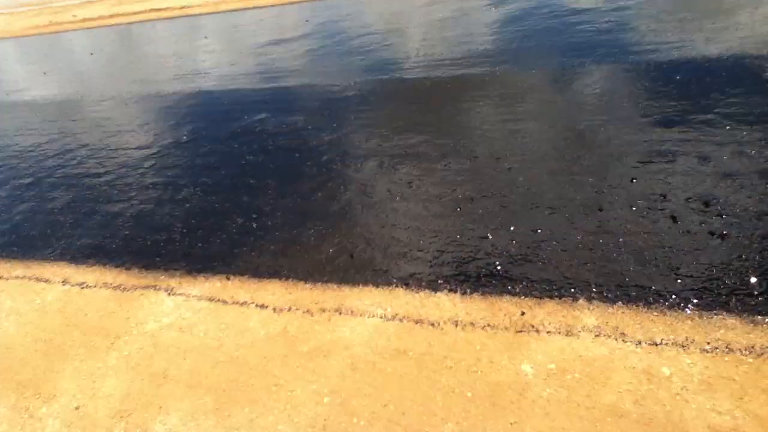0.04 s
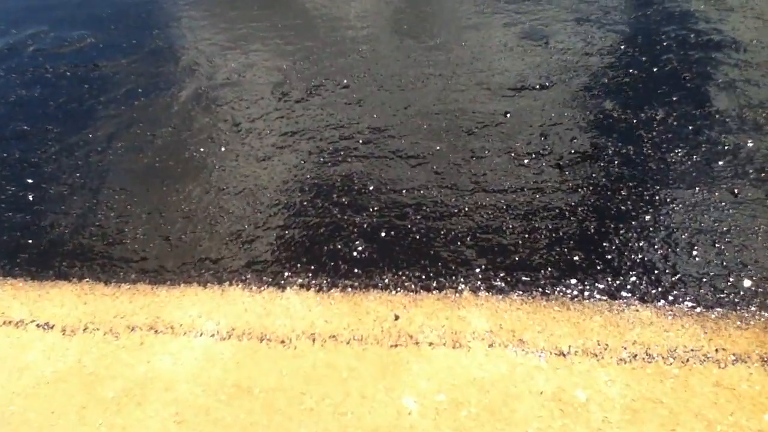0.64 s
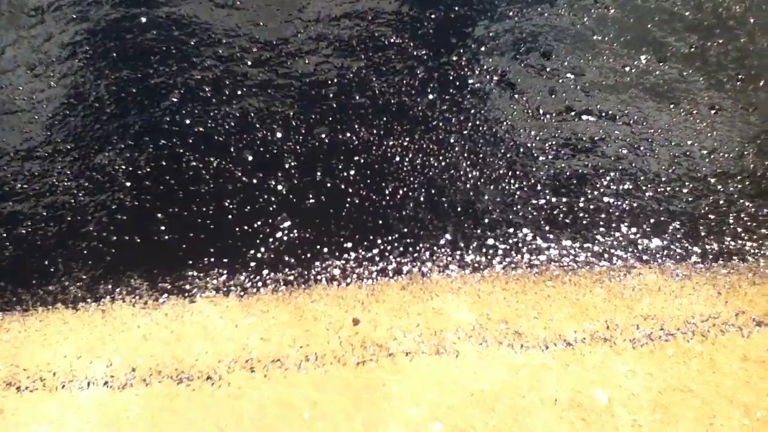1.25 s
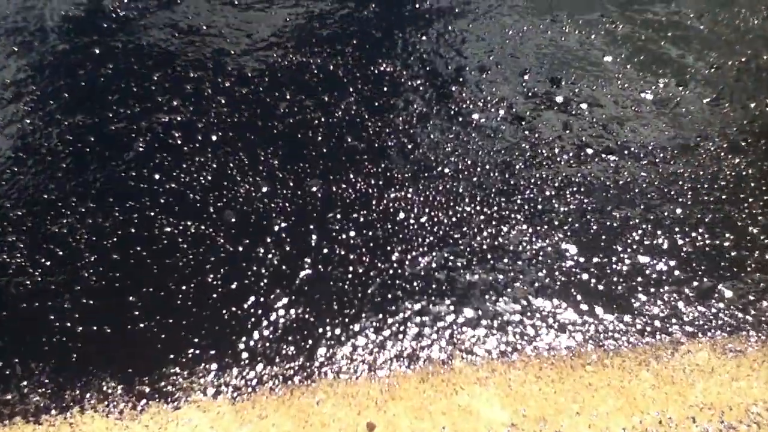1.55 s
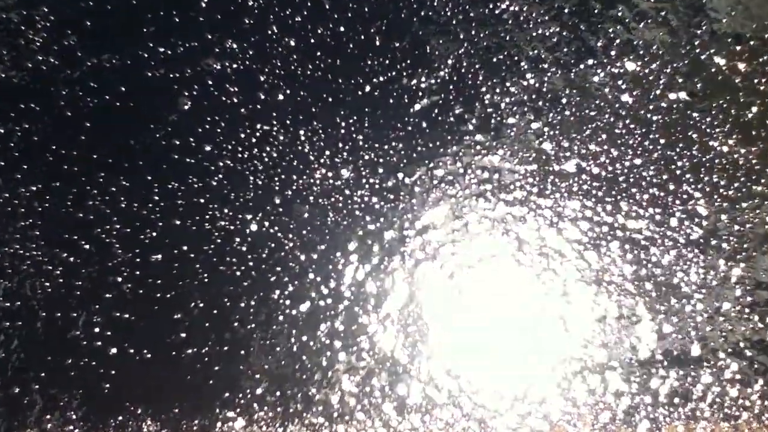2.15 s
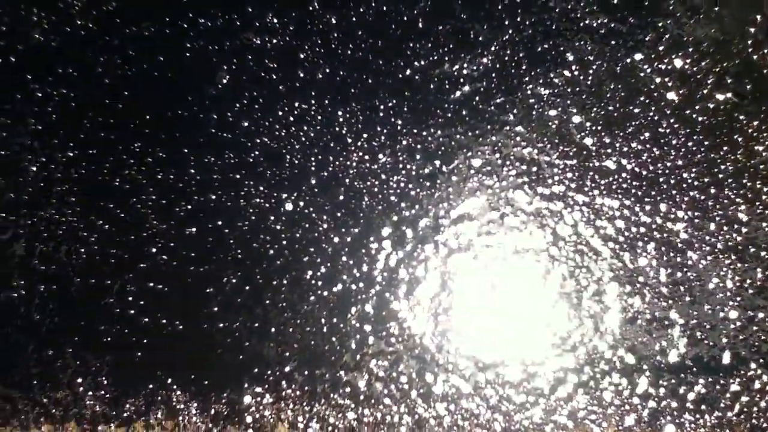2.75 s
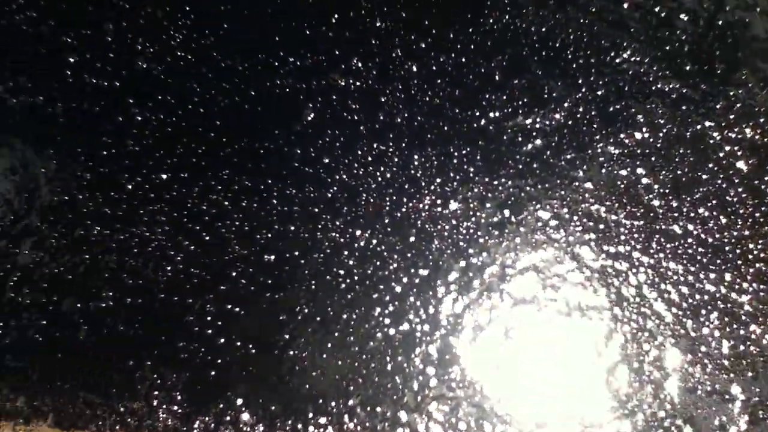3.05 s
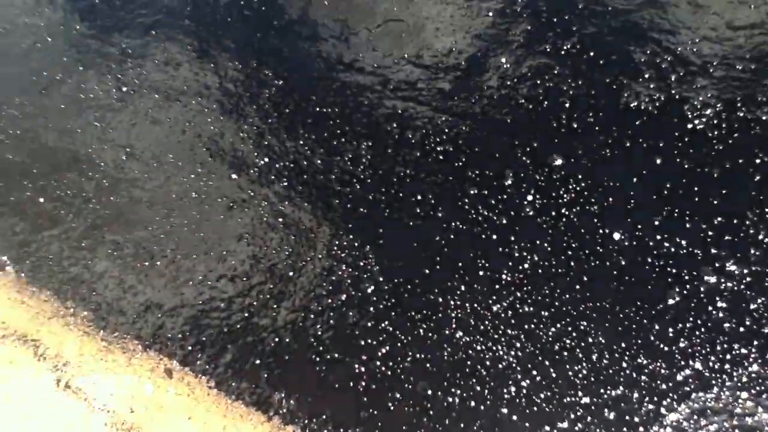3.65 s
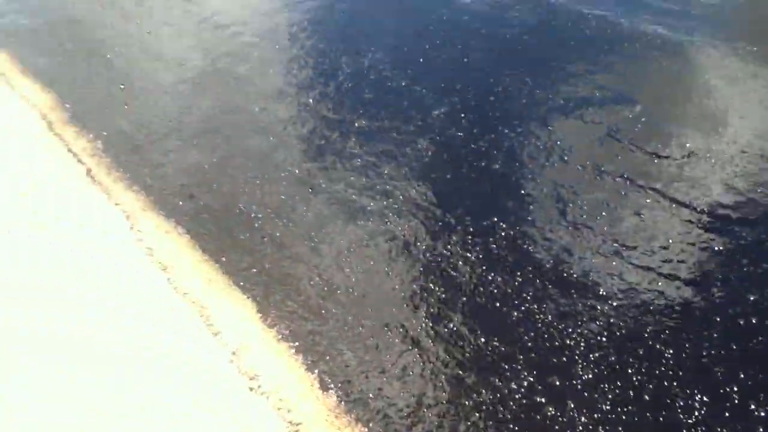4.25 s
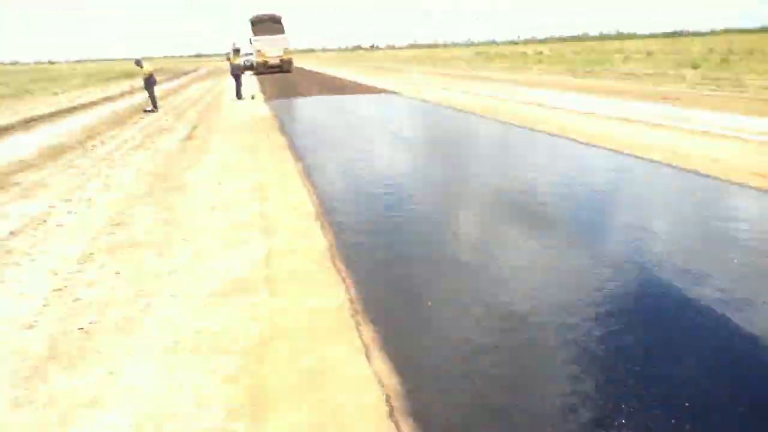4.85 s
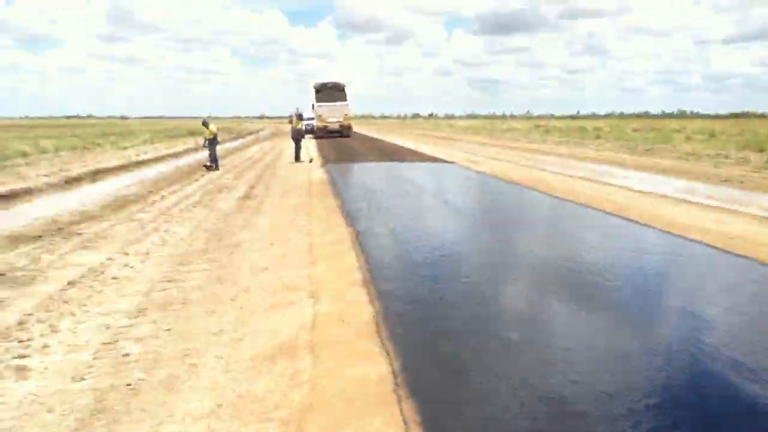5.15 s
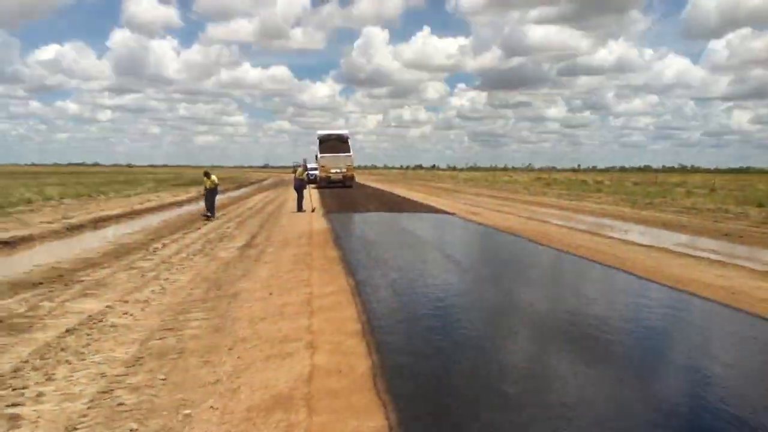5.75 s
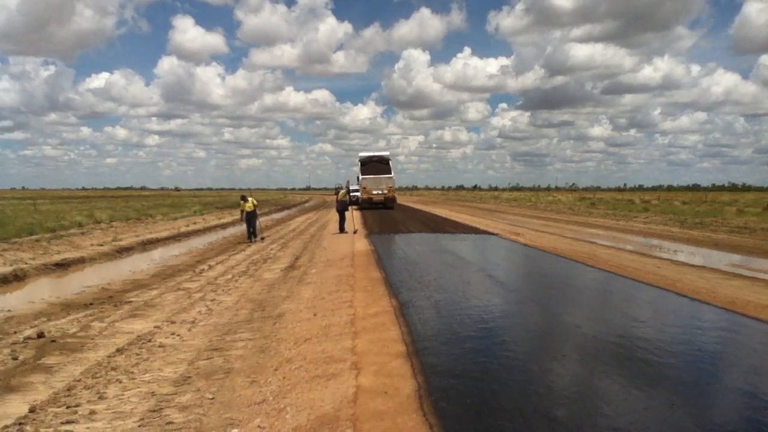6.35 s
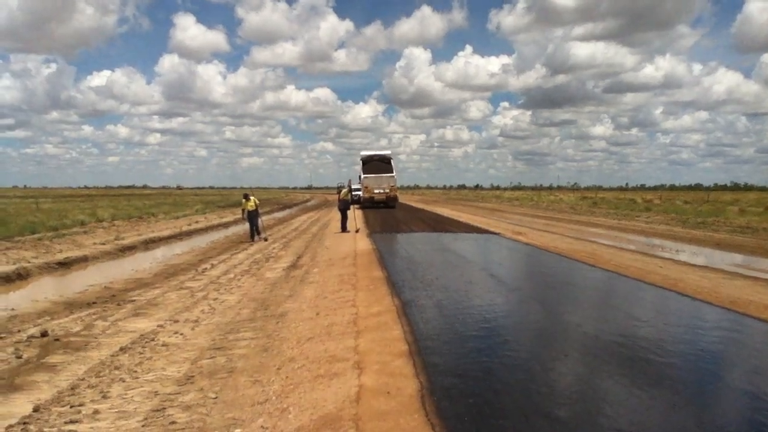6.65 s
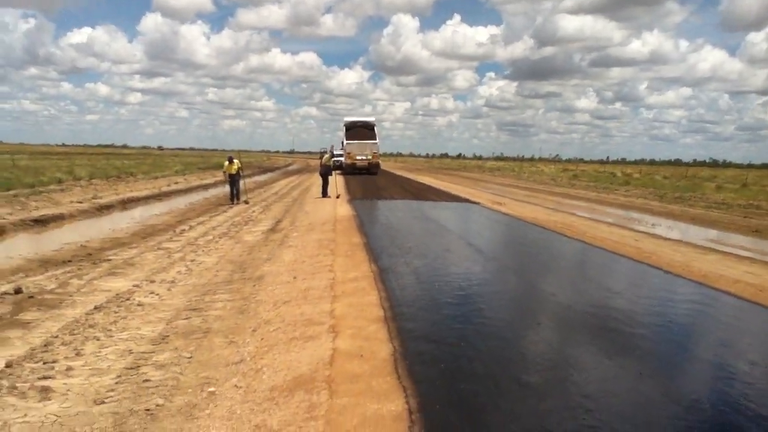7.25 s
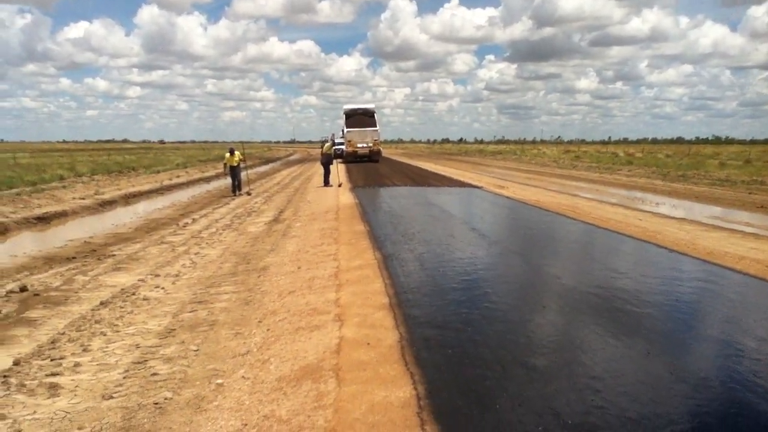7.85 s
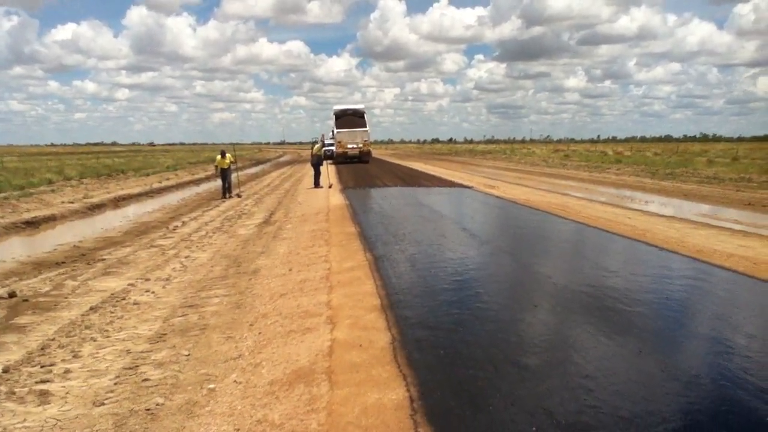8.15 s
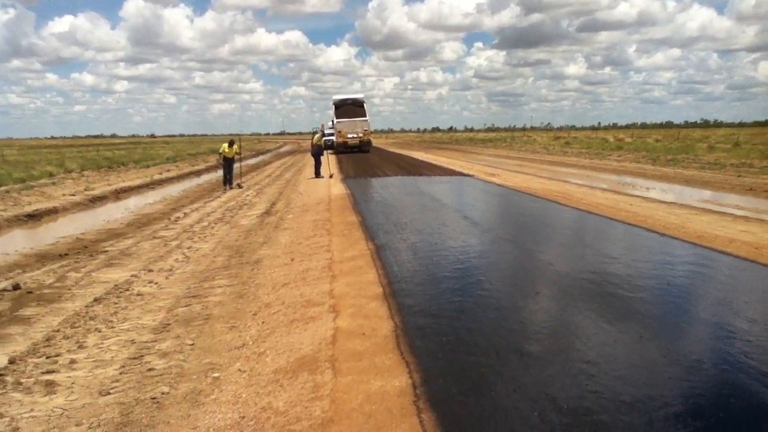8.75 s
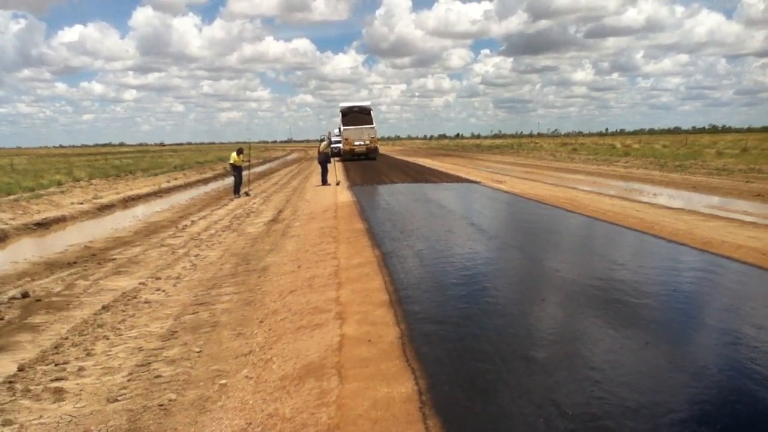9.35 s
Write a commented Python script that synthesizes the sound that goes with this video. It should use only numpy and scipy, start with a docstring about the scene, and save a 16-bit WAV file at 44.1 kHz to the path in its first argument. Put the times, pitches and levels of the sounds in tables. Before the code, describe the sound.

On an open country road, a distant sprayer truck hums steadily, with a faint wavering pump whine and a dull hiss of spray. Close to the microphone, hot tar fizzes softly as tiny bubbles burst, while shoes scuff gravel and clothes rustle. About halfway through, gusts hit the microphone and the fizz fades out. In the last third the wind blows hardest, rumbling, thumping and briefly crackling over the truck.

```python
"""An open country road: far off a bitumen sprayer's diesel hums, its pump whines, its spray bar hisses.
At first fresh hot binder fizzes close to the microphone as its bubbles burst, with a thin ring on top;
shoes scuff the gravel and clothes rustle. From about 3 s the microphone swings round to the truck;
gusts buffet it near 4 s, and by 4.7 s the fizz is gone. In the last third the wind blows hardest,
rumbling, thumping and briefly crackling at the microphone's port and pushing the recorder's gain down."""
import sys
import numpy as np
from scipy import signal
from scipy.fft import rfft, irfft, next_fast_len
from scipy.io import wavfile
from scipy.ndimage import uniform_filter1d, minimum_filter1d

SR = 44100
rng = np.random.default_rng(int(sys.argv[2]) if len(sys.argv) > 2 else 0)


def dump_mix(stems):
    """Bounce the given channels to the path in sys.argv[1] as a 16-bit WAV at rate SR."""
    frames = np.atleast_2d(stems).T  # one column per channel
    limited = np.clip(frames, -1, 1)  # hard clip at full scale
    pcm = np.round(limited * 32767).astype(np.int16)
    wavfile.write(sys.argv[1], SR, pcm)


N = 414099
FIRING_HZ = 183.6   # the diesel's firing rate
# fizz of the hot binder at the microphone: (time [s], relative level [dB])
FIZZ_LEVEL = [(0.0, -62), (0.25, -63), (0.8, -56.5), (1.08, -56.5), (1.69, -51.5), (2.0, -56.5),
              (2.67, -57), (3.04, -55), (3.81, -63), (4.3, -73)]


def from_db(db):
    """Decibels to gain."""
    return 10 ** (np.asarray(db) / 20)


def unit_rms(x):
    """Scale to rms 1."""
    return x / np.sqrt(np.mean(x ** 2) + 1e-20)


def seconds():
    """Time of every sample."""
    return np.arange(N) / SR


def curve(points):
    """Join (time, value) points into a value at every sample."""
    return np.interp(seconds(), *np.transpose(points))


def swells(rows):
    """Gain with one Gaussian rise and fall for each (time, level, half length)."""
    t = seconds()[::10]
    gain = sum(from_db(db) * np.exp(-.5 * np.minimum(((t - s) / half) ** 2, 20)) for s, db, half in rows)
    return np.interp(seconds(), t, gain)


def db_at(spectrum, hz):
    """Read a spectrum on a log-frequency axis."""
    points_hz, points_db = np.transpose(spectrum)
    return np.interp(np.log(hz), np.log(points_hz), points_db)


def drift(rate_hz):
    """Random wander of rms 1: noise through a double one-pole low-pass at rate_hz."""
    pole = np.exp(-2 * np.pi * rate_hz * 20 / SR)   # one step every 20 samples
    slow = signal.lfilter([1], [1, -2 * pole, pole * pole], rng.standard_normal(N // 20 + 4002))[4000:]
    return np.interp(np.arange(N) / 20, np.arange(len(slow)), unit_rms(slow))


def bandpass(x, low_hz, high_hz):
    """Keep what lies between two edges."""
    edges = np.clip([low_hz, high_hz], 20, .45 * SR)
    return signal.sosfilt(signal.butter(2, edges, "band", fs=SR, output="sos"), x)


def coloured(x, spectrum):
    """Give a sound a spectrum, closed steeply at both ends; rms 1."""
    size = next_fast_len(N)
    hz = np.maximum(np.arange(size // 2 + 1) * SR / size, 1)
    ends = 1 / (1 + (spectrum[0][0] / hz) ** 4) / (1 + (hz / spectrum[-1][0]) ** 8)
    return unit_rms(irfft(rfft(x, size) * from_db(db_at(spectrum, hz)) * ends, size)[:N])


def hiss(spectrum, flutter_db, flutter_hz):
    """Coloured noise whose level flutters."""
    return coloured(rng.standard_normal(N), spectrum) * from_db(flutter_db * drift(flutter_hz))


def shimmer(x, depth_db, rate_hz, count=11):
    """Let the colour of a hiss shift: neighbouring treble bands swell and sink on their own."""
    size = next_fast_len(N)
    spectrum, hz = rfft(x, size), np.arange(size // 2 + 1) * SR / size
    centres = np.geomspace(1500, 13000, count)
    bands = (irfft(spectrum * np.interp(hz, centres, share), size)[:N] for share in np.eye(count))
    return unit_rms(sum(band * from_db(depth_db * drift(rate_hz)) for band in bands))


def grains(per_s, spread_db):
    """Tiny clicks of random size and sign at random moments; rms 1."""
    sizes = from_db(spread_db * np.minimum(rng.exponential(1, N), 4)) * rng.choice([-1, 1], N)
    return unit_rms(sizes * (rng.random(N) < per_s / SR))


def tone(hz):
    """A sine of rms 1 on a moving pitch."""
    return np.sqrt(2) * np.sin(2 * np.pi * (np.cumsum(hz) / SR + rng.random()))


def self_noise(hiss_db=-61.5, whistle_db=-65, whistle_hz=14994):
    """The microphone's own hiss and a thin electronic whistle."""
    # noise floor: (frequency [Hz], relative density [dB])
    floor = [(1000, 1), (4000, -1.5), (7000, -0.5), (9000, -3), (12500, -1), (15000, -10)]
    whistle = from_db(whistle_db) * tone(np.full(N, whistle_hz))
    return whistle + from_db(hiss_db) * hiss(floor, flutter_db=0.1, flutter_hz=3)


def engine(wander=0.00135, fade_db=1.8, turn_s=3.14, turn_loss_db=6.0):
    """Far down the road, a governed diesel hums over its roar; the air fades each harmonic on its own."""
    # engine at the microphone: (time [s], level [dB])
    level = [(0, -37), (.5, -39), (1, -40.5), (1.7, -40.5), (3.3, -38.5), (4.9, -44), (6.5, -43.5),
             (9.39, -40.5)]
    # hum: (multiple of the firing rate, relative level [dB])
    harmonics = [(2, -0.4), (3, -3.5), (4, -21), (12, -24), (14, -25.5), (16, -34)]
    # the truck's roar: (frequency [Hz], relative density [dB])
    roar_spectrum = [(40, -10), (120, 3), (250, -2.5), (450, -1.5), (700, -11), (1000, -10.5),
                     (1500, -14.5), (2200, -19.5), (4000, -50.5)]
    firing_hz = FIRING_HZ * (1 + wander * drift(10))
    turned = np.clip((seconds() - turn_s) / 0.27 + .5, 0, 1)
    hum = 0
    for k, db in harmonics:
        fading_db = fade_db * np.sqrt(k / 2) * drift(1.8)
        loss_db = turn_loss_db * turned * (k <= 2)   # the lowest thins as the microphone swings round
        hum = hum + from_db(db + fading_db - loss_db) * tone(k * firing_hz)
    roar = hiss(roar_spectrum, flutter_db=0.5, flutter_hz=31)
    return from_db(curve(level)) * (hum + roar)


def pump(low_hz=10 * FIRING_HZ, high_hz=2305, wander=.001, fade_db=2.8):
    """Two slightly unsteady whines from the distant pump drive, the lower at a multiple of engine speed."""
    # lower whine, fading in and out on the wind: (time [s], level [dB])
    low_whine = [(0, -57.5), (.75, -52.5), (2.0, -62.5), (2.85, -60.5), (3.27, -52.5), (3.9, -63),
                 (4.55, -55.5), (4.9, -67), (5.3, -62.5), (7.6, -58), (8.2, -52.5), (8.5, -67), (8.85, -57),
                 (9.39, -66)]
    # higher whine, once the microphone faces the truck: (time [s], level [dB], half length [s])
    high_whine = [(5.13, -55, 0.062), (5.62, -59, 0.048), (5.83, -52.5, 0.067), (6.36, -57, 0.06),
                  (7.8, -56, 0.14), (8.37, -53, 0.13), (9.13, -53.5, 0.086)]
    out = 0
    for hz, gain in (low_hz, from_db(curve(low_whine))), (high_hz, swells(high_whine)):
        out = out + gain * from_db(fade_db * drift(17)) * tone(hz * (1 + wander * drift(22)))
    return out


def spray_bar(body_db=1.5, top_db=-57, top_growth=2.56):
    """The jets' hiss, dulled by distance; its top swells most when the air carries it well."""
    # spray at the microphone: (time [s], relative level [dB])
    level = [(0, -50), (.8, -49), (1.9, -58), (3.1, -56), (4.15, -46), (4.9, -57.5), (5.35, -52),
             (6.55, -48.5), (7.3, -50), (9.39, -53)]
    # body of the hiss: (frequency [Hz], relative density [dB])
    body_spectrum = [(700, 12), (1300, -12), (1750, 2.5), (2050, -5), (2600, 3.5), (3200, -4.5),
                     (4000, -10), (5500, -22), (9000, -40)]
    # its brightest part: (frequency [Hz], relative density [dB])
    top_spectrum = [(2800, -12.5), (3400, -1), (4200, -8.5), (5500, -10.5), (8000, -21.5)]
    level_db = curve(level)
    body = from_db(level_db + body_db) * hiss(body_spectrum, flutter_db=1.07, flutter_hz=14)
    top_gain = from_db(top_db + top_growth * (level_db - level_db.max()))
    return body + top_gain * hiss(top_spectrum, flutter_db=0.5, flutter_hz=3.5)


def binder_fizz(boost_db=8.0, turned_away_s=4.68):
    """Close by, tiny bubbles burst in the hot film; the fizz is lost once the microphone faces away."""
    # bursting bubbles: (frequency [Hz], relative density [dB])
    spectrum = [(600, 6.5), (1500, 2), (2800, 3.5), (4200, 1), (6500, -2), (8000, -4), (10500, -5.5),
                (13000, -17), (15000, -24)]
    bubbles = coloured(grains(per_s=11000, spread_db=-1.5), spectrum)
    fizz = shimmer(bubbles, depth_db=2.0, rate_hz=3.2)
    facing = np.clip((turned_away_s - seconds()) / 0.34, 0, 1)
    return fizz * from_db(curve(FIZZ_LEVEL) + boost_db + drift(7.3)) * facing


def sizzle(width_hz=80, flutter_db=1.0, bed_db=-6):
    """A thin, breathy ring high in the treble: it follows the fizz and flares up in uneven bursts."""
    # flares of the ring: (time [s], level [dB], half length [s])
    bursts = [(0.78, -62.5, 0.09), (1.3, -57, 0.061), (1.55, -52, 0.065), (2.05, -56, 0.09),
              (2.26, -48.5, 0.03), (2.85, -58.5, 0.15), (3.14, -59.5, 0.032), (3.56, -59.5, 0.06),
              (5.9, -75.5, 0.3)]
    # centre of the ring: (time [s], pitch [Hz])
    pitch = [(0.3, 11600), (1.7, 12050), (4.0, 12100)]
    breath = signal.sosfilt(signal.butter(1, width_hz, fs=SR, output="sos"), drift(500))
    gain = np.hypot(swells(bursts), from_db(curve(FIZZ_LEVEL) + bed_db))
    return unit_rms(breath) * tone(curve(pitch)) * gain * from_db(flutter_db * drift(10))


def clothes(flutter_db=1.5):
    """Cloth slides over cloth as someone turns on the spot: soft swells, each with its own colour."""
    # rustles: (time [s], level [dB], half length [s], centre [Hz], width [Hz])
    rustles = [(0.075, -48.5, 0.17, 4100, 3380), (0.086, -51.5, 0.079, 6300, 1090),
               (1.77, -56, .07, 10600, 2600), (2.144, -51, 0.19, 4300, 1800),
               (2.586, -60.5, 0.26, 5450, 700), (3.233, -53, .055, 6360, 850),
               (4.07, -54.5, 0.25, 4540, 3600), (6.2, -63, 0.13, 5170, 3580)]
    out = 0
    for s, db, half, hz, width in rustles:
        friction = bandpass(rng.standard_normal(N), hz - width / 2, hz + width / 2)
        out = out + swells([(s, db, half)]) * unit_rms(friction)
    return out * from_db(flutter_db * drift(22))


def shoes():
    """Near the microphone a sole drags over gravel: short swells of dense grains."""
    # scuffs: (time [s], level [dB], half length [s])
    scuffs = [(0.906, -34, 0.014), (1.596, -32, 0.021), (3.578, -42.5, 0.091), (3.903, -45.5, 0.086),
              (4.814, -41, 0.011), (6.834, -40, 0.016)]
    # grit under the sole: (frequency [Hz], relative density [dB])
    grit = [(300, 12), (700, 7.5), (1500, 0.5), (3000, 2.5), (6500, -6), (10000, -13), (15000, -29)]
    return swells(scuffs) * coloured(grains(per_s=2400, spread_db=3.0), grit)


def crackles(decay_s=0.0007, width_octaves=1.44):
    """The microphone crackles in the strongest gust: very short snaps over a patter of finer ticks."""
    # snaps: (time [s], peak before the band-pass [dB], centre [Hz])
    snaps = [(6.867, -19.5, 9800), (6.933, -34, 8000), (7.089, -23, 8000), (7.093, -7.5, 1890),
             (7.163, -19, 4570), (7.277, -31, 6960)]
    # fine ticking around them: (time [s], level [dB], half length [s])
    patter = [(7.04, -61, 0.22)]
    ticks = bandpass(grains(per_s=150, spread_db=1.5), low_hz=4000, high_hz=12000)
    out = swells(patter) * unit_rms(ticks)
    t = seconds()[:1000]
    edge_ratio = 2 ** (width_octaves / 2)
    for s, peak_db, hz in snaps:
        burst = from_db(peak_db) * rng.choice([-1, 1], len(t)) * np.exp(-t / decay_s)
        out[round(s * SR) + np.arange(len(t))] += bandpass(burst, hz / edge_ratio, hz * edge_ratio)
    return out


def thumps(damping=3.48, rebound_db=-11, rebound_hz=120, rebound_s=0.0058):
    """An eddy hits the port: a brief suction between smaller swells of pressure, then a low rebound."""
    # single eddies on the microphone: (time [s], peak [dB], pitch [Hz])
    eddies = [(2.849, -11, 184), (2.935, -7.5, 253), (2.983, -11.5, 160), (3.351, -15.5, 1140),
              (3.352, 4.5, 410), (3.913, -3, 200), (3.933, 3.5, 326), (4.034, -9.5, 372), (4.098, 0.5, 420),
              (4.283, -8, 566), (4.524, 0, 263), (4.607, -2.5, 204), (4.923, -7, 322), (5.336, -9.5, 270),
              (5.76, -12, 237), (6.87, 7, 395), (6.972, 4, 395), (7.092, 2.5, 403), (7.185, 5, 700),
              (7.645, 0.5, 655), (7.785, 0.5, 440), (8.194, 1, 213), (8.253, -1, 395), (8.345, 0.5, 576),
              (8.53, -1, 543), (8.615, 4, 474), (8.798, -5, 680), (8.989, 4, 342), (9.146, 0.5, 454),
              (9.244, -5, 990)]
    out = np.zeros(N)
    for s, peak_db, hz in eddies:
        near = round(s * SR) + np.arange(-900, 1800)
        t = near / SR - s
        after = np.maximum(t, 0)
        suction = -np.cos(2 * np.pi * hz * t) / np.cosh(damping * hz * t)
        rebound = np.sin(2 * np.pi * rebound_hz * after) * np.exp(-after / rebound_s)
        out[near] += from_db(peak_db) * (suction + from_db(rebound_db) * rebound)
    return out


def wind_level(rise_db_per_s=367.5, sag_db_per_s=2.5, fall_db_per_s=227.5):
    """Level in dB: each gust rises quickly out of the breeze, sags while it holds, then falls away."""
    # breeze between the gusts: (time [s], level [dB])
    breeze = [(0, -30), (2.4, -43), (3.1, -31), (3.7, -38.5), (4.6, -21), (5.1, -31.5), (6.6, -30),
              (6.9, -13), (8.2, -14.5), (8.45, -19), (8.9, -33), (9.39, -21)]
    # gusts on the microphone: (time [s], hold [s], level [dB])
    gusts = [(0.059, 0.16, -23.5), (0.413, 0.089, -26), (0.857, 0.11, -27), (1.909, 0.08, -32.5),
             (2.604, 0.36, -30.5), (2.904, 0.084, -24), (3.113, 0.048, -23), (3.233, 0.1, -23.5),
             (3.87, 0.033, -21.5), (3.917, 0.027, -16), (4.089, 0.12, -11), (4.203, 0.1, -9.5),
             (4.332, 0.036, -12), (4.392, 0.041, -9.5), (4.484, 0.062, -15), (4.606, 0.079, -16.5),
             (4.907, 0.052, -21), (5.16, 0.13, -25.5), (5.322, 0.029, -26), (5.532, 0.076, -22),
             (5.713, 0.093, -25.5), (6.153, .15, -28.5), (6.708, 0.037, -11.5), (6.749, 0.051, -8.5),
             (6.833, 0.099, -7.3), (6.995, .11, -6), (7.155, 0.01, -11.5), (7.189, 0.058, -7),
             (7.319, 0.089, -7.5), (7.483, 0.086, -10.5), (7.636, 0.061, -7.5), (7.76, 0.019, -11),
             (7.83, .13, -12.5), (8.009, 0.051, -10.5), (8.188, 0.0096, -13), (8.224, 0.032, -12.5),
             (8.32, 0.036, -8), (8.412, 0.026, -14.5), (8.52, 0.038, -15.5), (8.581, 0.028, -13.5),
             (8.665, 0.021, -15), (8.782, 0.063, -16), (8.995, 0.11, -10.5), (9.14, 0.18, -10),
             (9.294, 0.064, -8.5)]
    t = seconds()[::20]
    level_db = curve(breeze)[::20]
    for s, hold_s, db in gusts:
        before, since, after = np.maximum([s - t, t - s, t - s - hold_s], 0)
        gust_db = db - rise_db_per_s * before - sag_db_per_s * since - fall_db_per_s * after
        level_db = np.maximum(level_db, gust_db)
    return np.interp(seconds(), t, level_db)


def wind(breeze_lump_db=4.5, gust_lump_db=2.48, lump_hz=55, flutter_db=0.5, db_per_octave=13.5):
    """Turbulence at the microphone's port: harder gusts carry smaller eddies, so they sound brighter."""
    # smallest eddies in a gust of -18 dB: (time [s], frequency above which they die [Hz])
    eddy_limit = [(3.9, 160), (4.2, 205), (4.6, 186), (6.8, 190), (7.05, 236), (7.65, 234), (8.1, 187),
                  (8.4, 213), (9.39, 206)]
    # the port's response to turbulence: (frequency [Hz], relative gain [dB])
    port = [(20, -54.5), (43, -20.5), (86, -7.5), (135, -0.5), (200, 1.5), (330, 2.5), (550, 2.5),
            (900, -1.5), (1700, -7), (3000, -0.5)]
    level_db = wind_level()
    strength_db = np.clip(level_db, -30, -6)   # above -6 dB a gust would grow louder but no brighter
    limit_hz = curve(eddy_limit) * 2 ** ((strength_db + 18) / db_per_octave)
    # in a breeze the eddies come one by one, in a gust they merge into a rolling rumble
    lumps_db = np.interp(level_db, [-20, -10], [breeze_lump_db, gust_lump_db]) * drift(lump_hz)
    edges_hz = 20 * 2 ** np.arange(0, 7.5, .5)
    white = rng.standard_normal((2, N))
    rumble, power = 0, 0
    for k, (low, high) in enumerate(zip(edges_hz, edges_hz[1:])):
        hz = np.sqrt(low * high)
        band = unit_rms(bandpass(bandpass(white[k % 2], low, high), low, high))
        # viscosity kills the smallest eddies: the spectrum falls exponentially
        gain = from_db(db_at(port, hz)) * np.exp(-hz / limit_hz) * np.sqrt(high - low)
        # small eddies come in sharper bursts than large ones
        bursts = from_db((hz / 300) ** 0.5 * lumps_db + flutter_db * drift(32))
        rumble = rumble + band * gain * bursts
        power = power + gain ** 2
    rumble = rumble / np.sqrt(power)
    steady = rumble / np.sqrt(uniform_filter1d(rumble ** 2, size=3000) + 1e-12)
    return steady * from_db(level_db)


def gain_control(x, threshold_db=-11.5, release_db_per_s=3.5, attack_s=0.015):
    """Loud gusts push the recorder's gain down; it creeps back over seconds."""
    pole = np.exp(-1 / (attack_s * SR))
    level_db = 10 * np.log10(signal.lfilter([1 - pole], [1, -pole], x ** 2) + 1e-12)
    excess_db = np.maximum(level_db - threshold_db, 0)
    recovery_db = release_db_per_s * seconds()
    cut_db = np.maximum.accumulate(excess_db + recovery_db, axis=-1) - recovery_db
    return x * from_db(-cut_db)


def scene():
    """Flat open ground: no echo, everything reaches one microphone directly."""
    far = engine() + pump() + spray_bar()
    near = binder_fizz() + sizzle() + shoes() + clothes()
    at_microphone = wind() + thumps() + crackles() + self_noise()
    return (far + near + at_microphone)[None]


def record(dry):
    """The recorder: low cut, gain control, a fast limiter for peaks that slip through, then a top cut."""
    low_cut_hz, top_cut_hz, ceiling = 35, 15600, .7
    low_cut = signal.butter(2, low_cut_hz, "high", fs=SR, output="sos")
    top_cut = signal.ellip(10, .1, 80, top_cut_hz, fs=SR, output="sos")
    held = gain_control(signal.sosfilt(low_cut, dry))
    needed_gain = np.minimum(1, ceiling / (np.abs(held) + 1e-9))
    limiter_gain = uniform_filter1d(minimum_filter1d(needed_gain, size=201), size=201)
    fade_out = np.minimum((N - np.arange(N)) / 200, 1)
    return signal.sosfilt(top_cut, held * limiter_gain * fade_out)


dry = scene()
out = record(dry)
dump_mix(out)
```